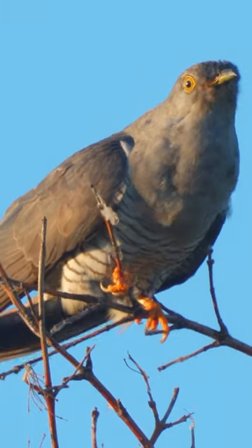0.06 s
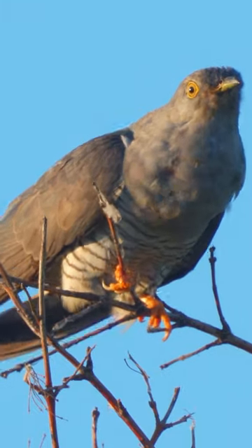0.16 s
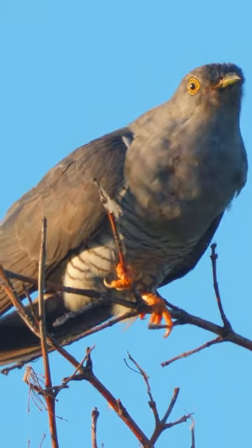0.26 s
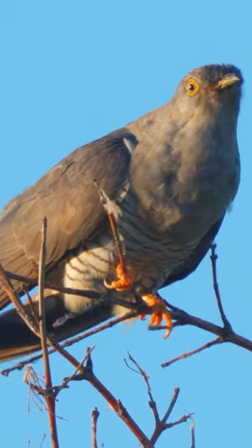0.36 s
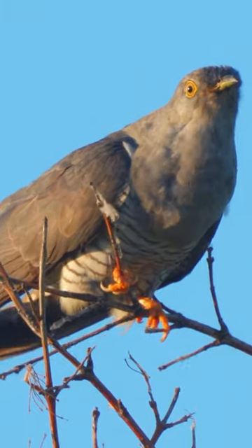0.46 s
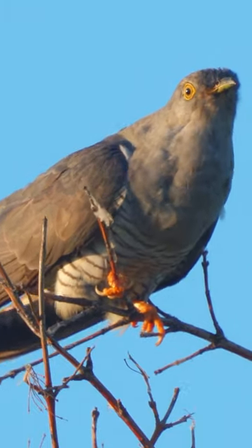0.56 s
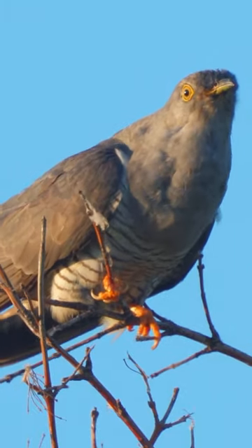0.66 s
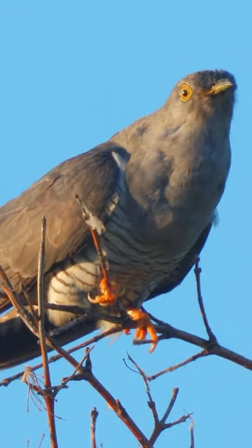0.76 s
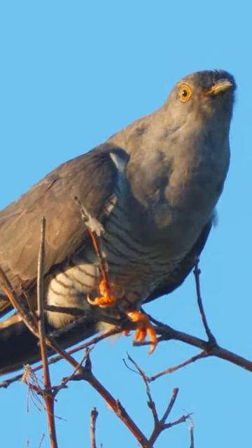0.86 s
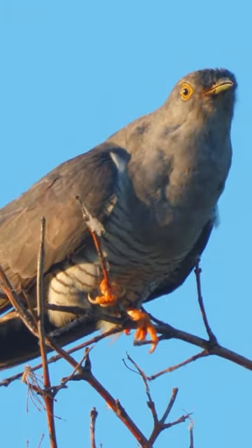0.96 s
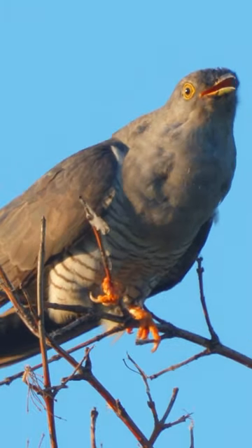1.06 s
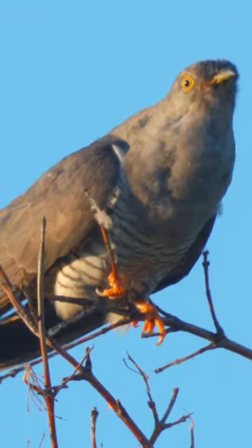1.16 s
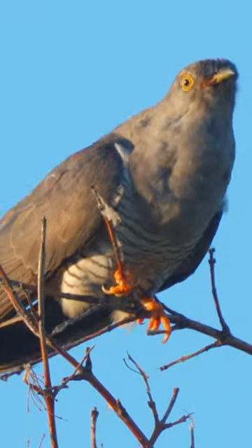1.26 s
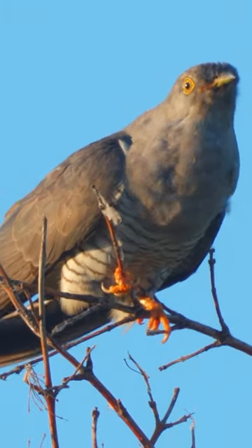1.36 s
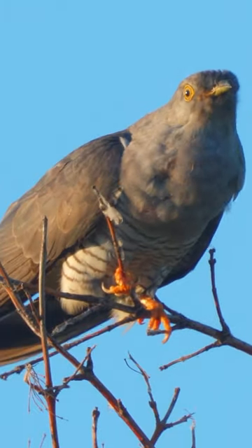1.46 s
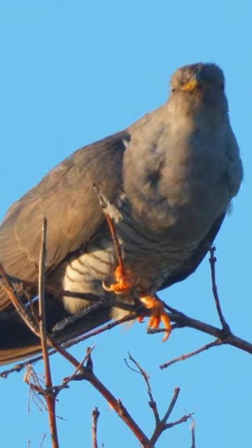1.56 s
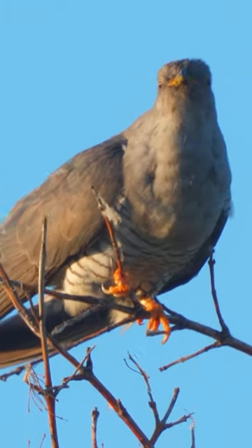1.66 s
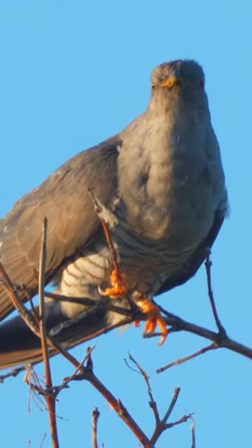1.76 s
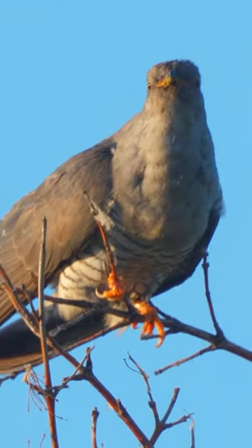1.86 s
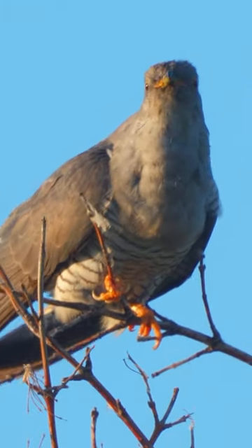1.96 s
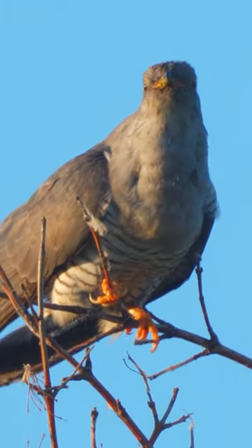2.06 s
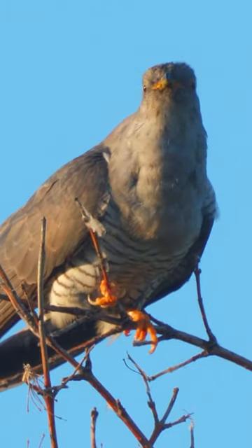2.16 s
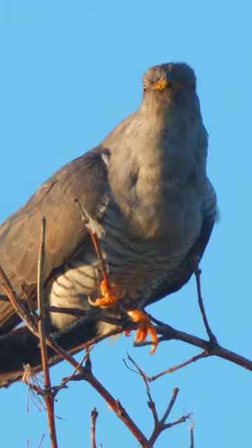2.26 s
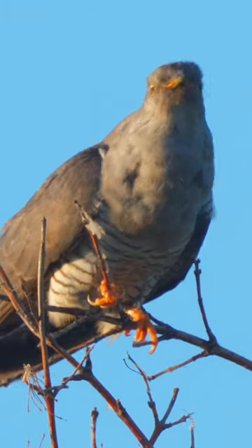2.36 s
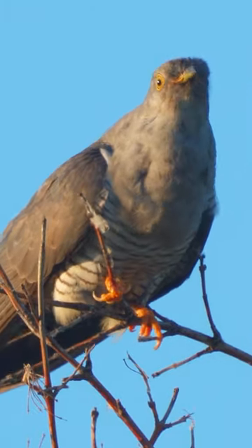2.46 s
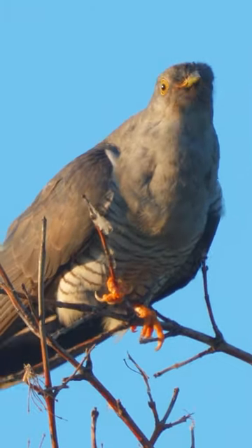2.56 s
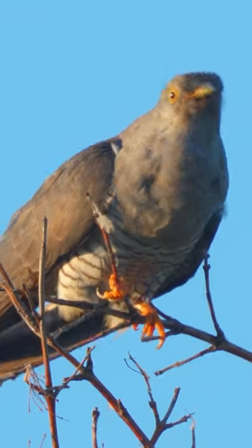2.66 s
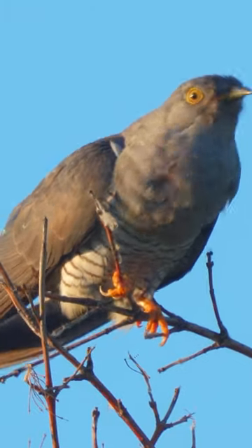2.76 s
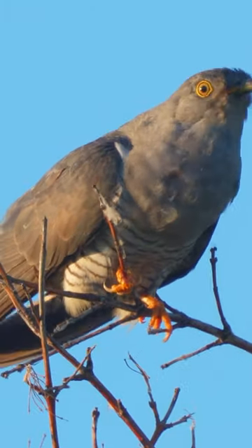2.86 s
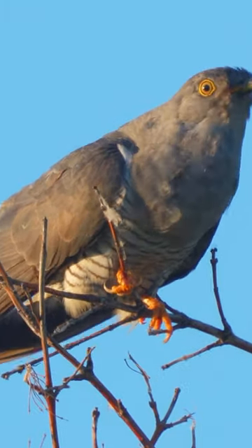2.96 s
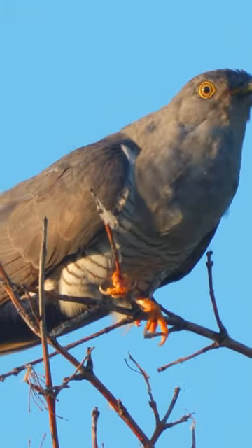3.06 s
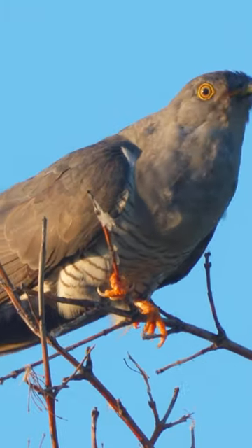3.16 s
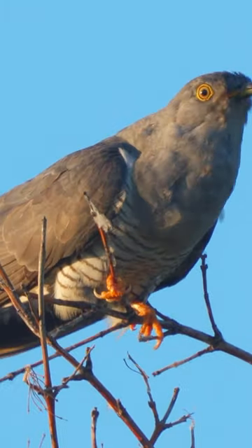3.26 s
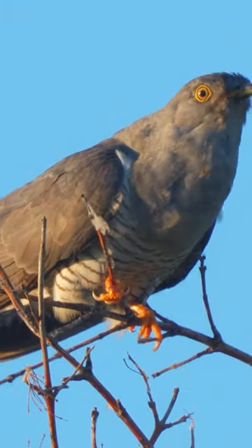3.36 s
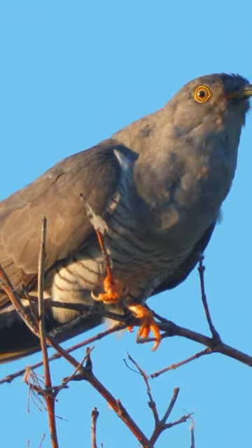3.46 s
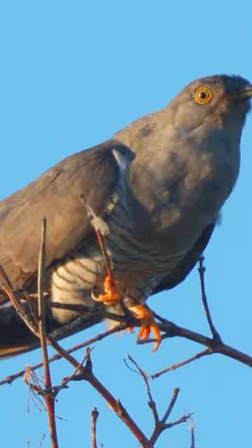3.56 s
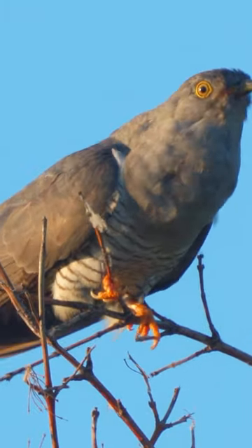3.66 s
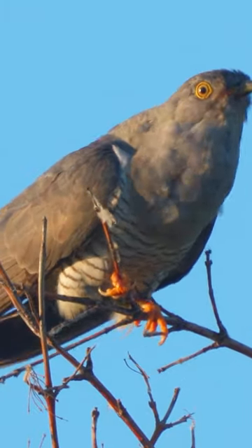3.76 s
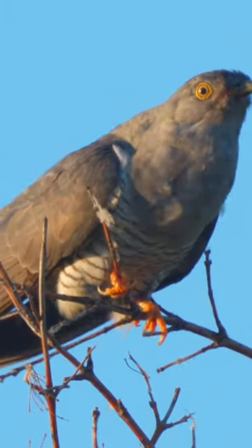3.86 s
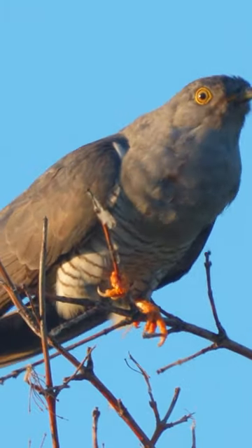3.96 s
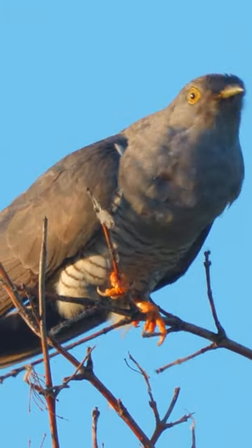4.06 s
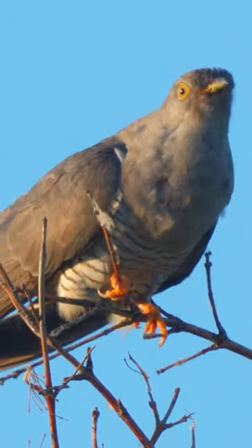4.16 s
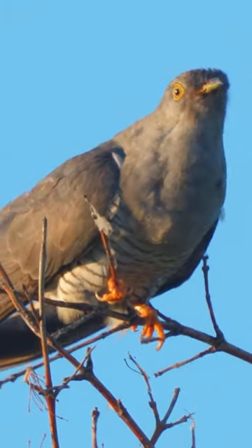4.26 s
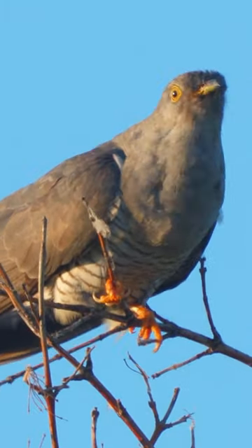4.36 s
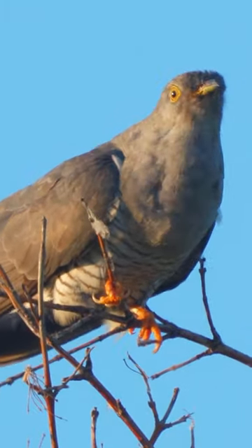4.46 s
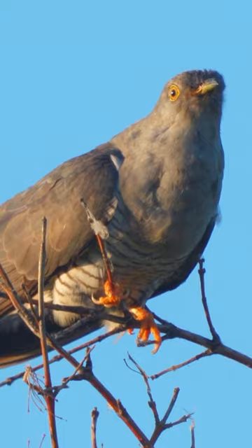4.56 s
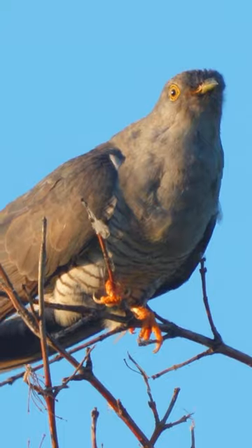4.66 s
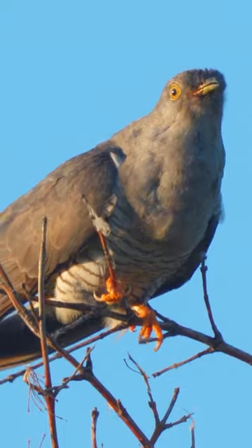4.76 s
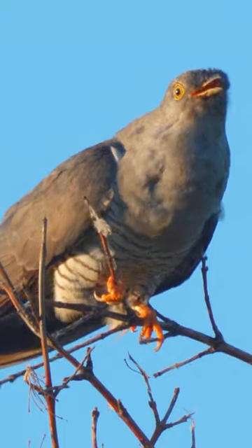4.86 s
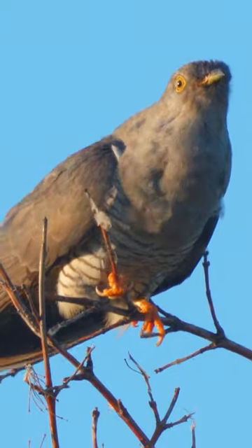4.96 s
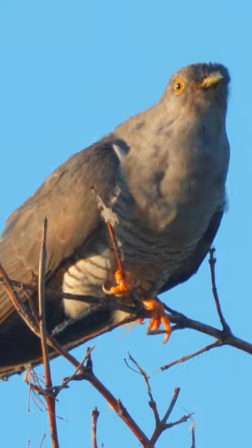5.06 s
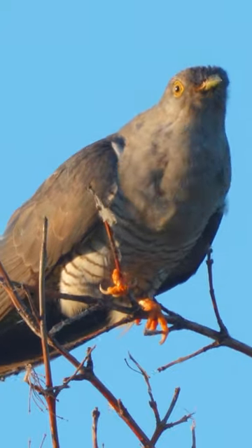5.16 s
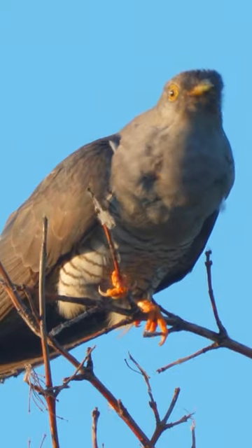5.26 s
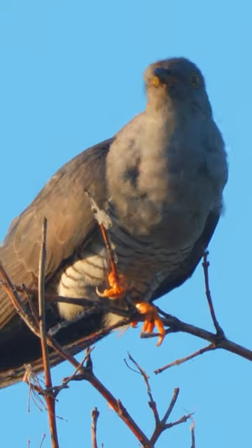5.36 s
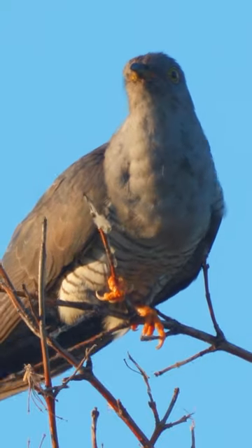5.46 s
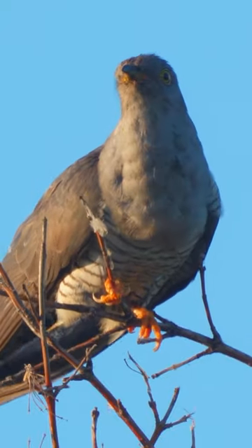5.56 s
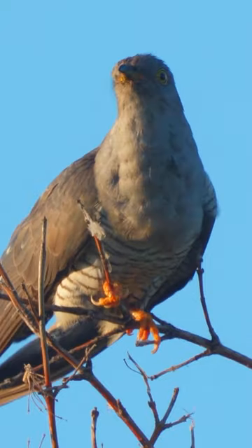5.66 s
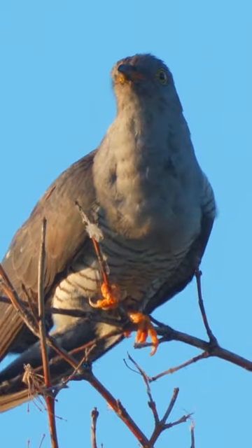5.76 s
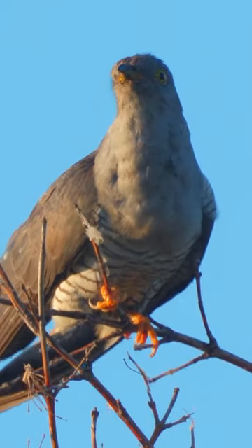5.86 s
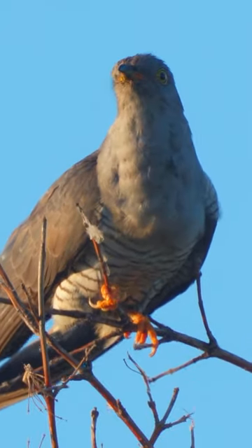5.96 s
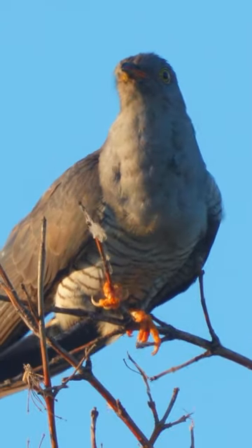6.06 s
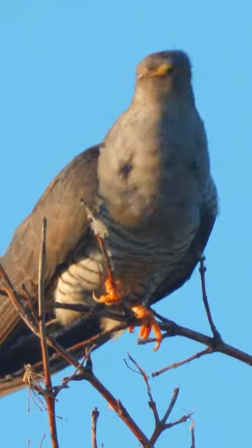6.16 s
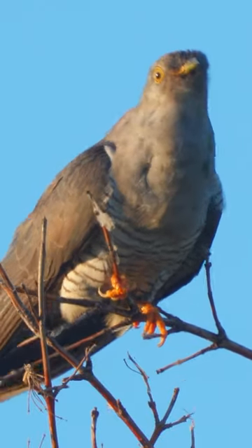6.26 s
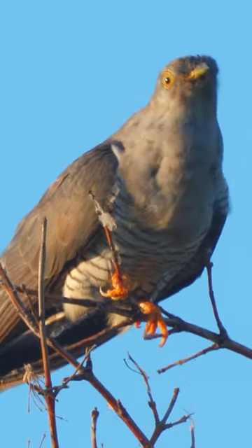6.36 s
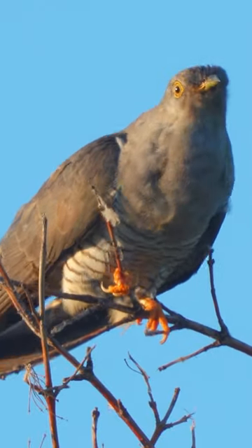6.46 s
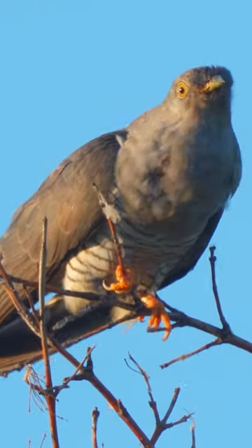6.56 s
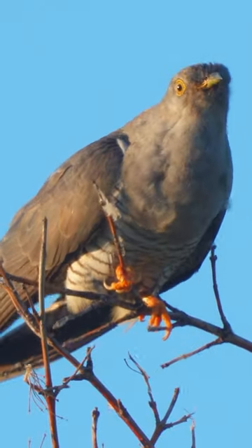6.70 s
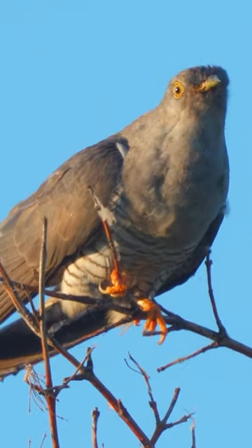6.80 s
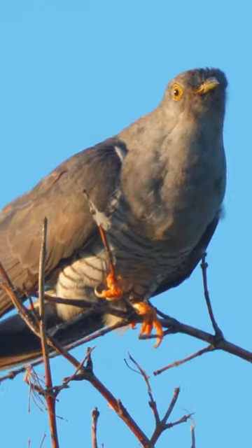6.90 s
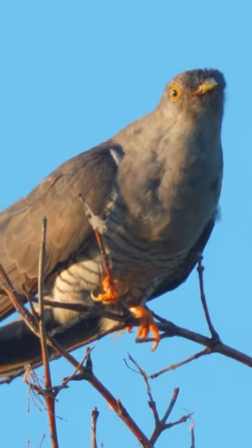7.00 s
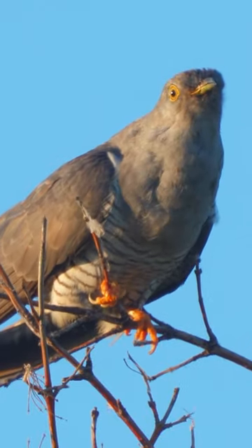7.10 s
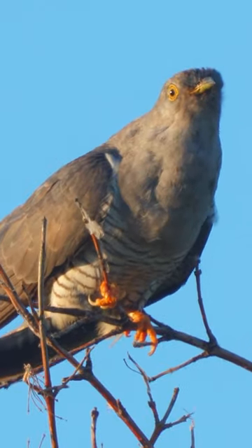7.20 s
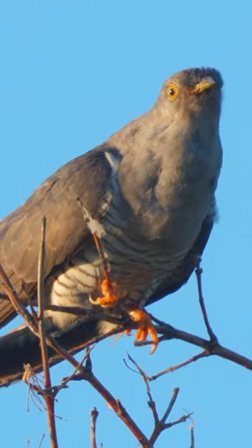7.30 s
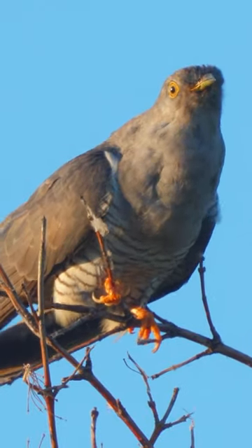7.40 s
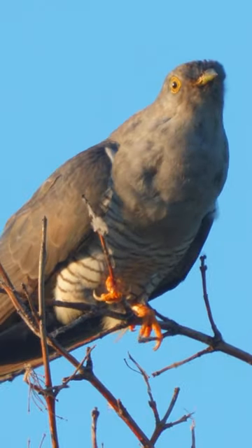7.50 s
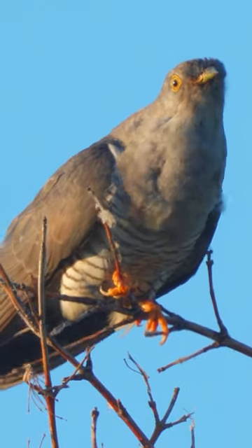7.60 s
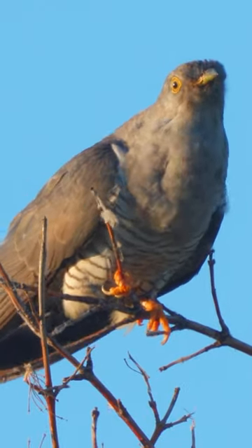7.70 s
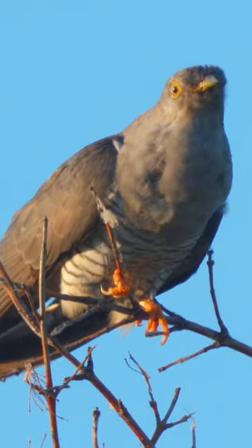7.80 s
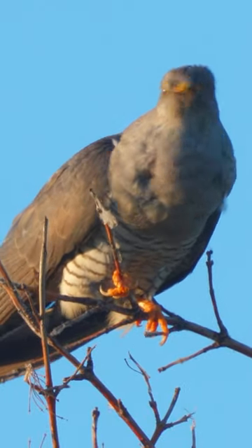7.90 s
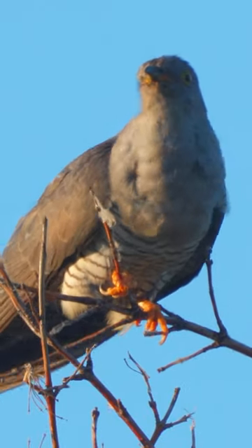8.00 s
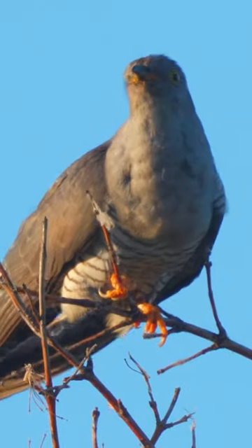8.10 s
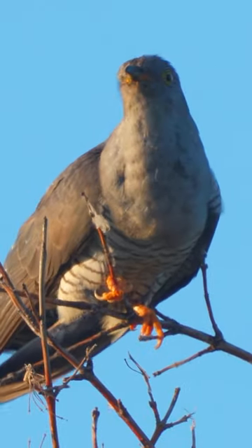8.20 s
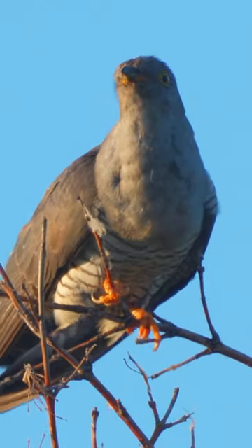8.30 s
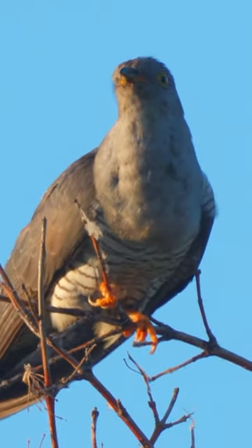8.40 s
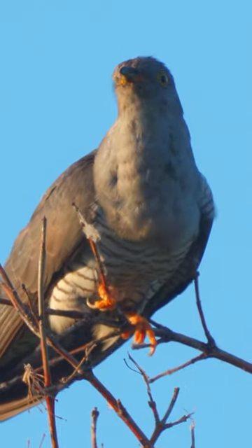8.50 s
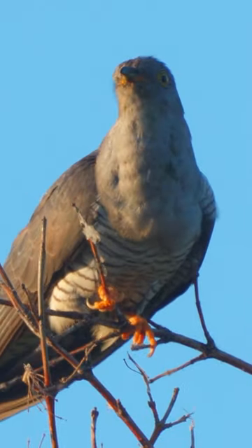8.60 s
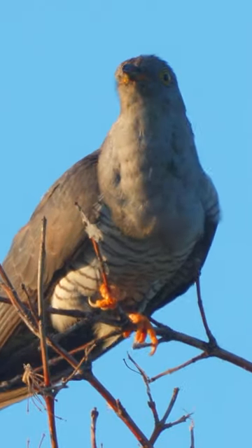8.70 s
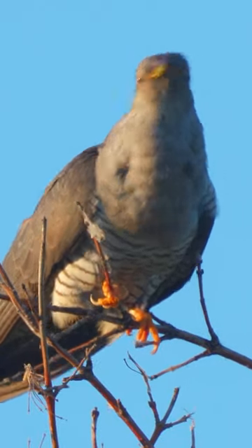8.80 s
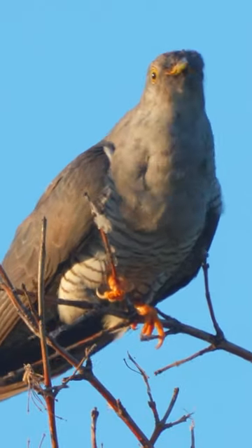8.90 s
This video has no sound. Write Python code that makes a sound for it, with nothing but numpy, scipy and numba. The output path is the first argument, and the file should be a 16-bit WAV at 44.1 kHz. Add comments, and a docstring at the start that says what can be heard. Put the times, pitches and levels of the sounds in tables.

```python
"""A cuckoo close to the microphone sings two hollow, almost pure notes, sines that scoop up, sag and drop;
the trees around return a ragged echo, made by convolution with decaying noise.
Further off, frequency-modulated sines make chattering warblers, a mole cricket pulses a sagging tone,
overlapping toad hoots merge into drones, and an engine's impulses ring its exhaust resonances.
Coloured noise hisses over a faint whine; a limiter flattens every cuckoo note and ducks the background."""
import sys
import numpy as np
from scipy import signal
from scipy.fft import rfft, irfft
from scipy.io import wavfile
from scipy.ndimage import uniform_filter1d, minimum_filter1d, map_coordinates
from numba import njit

SR = 44100
rng = np.random.default_rng(int(sys.argv[2]) if len(sys.argv) > 2 else 0)


def store_pcm(level_fs):
    """Save levels as 16-bit WAV."""
    pcm = np.round(np.clip(level_fs, -1, 1) * 32767).astype(np.int16)
    wavfile.write(sys.argv[1], SR, np.atleast_2d(pcm).T)


N = 394254
T = np.arange(N) / SR
LEAD_IN = SR // 4  # samples before time zero, whose echoes still ring
COURSE = np.array([0, .5, 1])  # start, middle and end of a small bird's note


def undb(db):
    """Logarithmic level: 20 dB is a tenfold amplitude."""
    return 10 ** (np.asarray(db) / 20)


def level(x, db):
    """Root mean square: scale a signal to an rms level in dB."""
    return x * undb(db) / np.sqrt(np.mean(x ** 2) + 1e-18)


def add(track, s, x):
    """Superposition: mix x into the track from time s."""
    i = int(np.clip(s * SR, 0, len(track)))
    track[i:i + len(x)] += x[:len(track) - i]


def walk(rate, size=N):
    """Band-limited randomness: smooth wandering through `rate` random points per second, spread near 1."""
    steps = rng.standard_normal(int(size / SR * rate) + 4)
    place = np.arange(size) / SR * rate + 1
    return map_coordinates(steps, [place], order=3, mode="nearest")


def turn(hz):
    """Phase is the time integral of frequency."""
    return 2 * np.pi * np.cumsum(hz) / SR


def resonate(x, hz, width):
    """Two-pole resonance, gain 1 at the centre."""
    return signal.lfilter(*signal.iirpeak(hz, hz / width, fs=SR), x)


def swell(u, edge):
    """Amplitude envelope over u = 0..1 with rounded ends."""
    return np.sin(np.pi / 2 * np.clip(np.minimum(u, 1 - u) / edge, 0, 1)) ** 2


def trees(x, wet_db, t60, build_s):
    """Multiple scattering: trunks and leaves add a diffuse tail that builds up, then dies away."""
    t = T[:SR * 3 // 2]
    build_up = 1 - np.exp(-(t / build_s) ** 2)
    decay = np.exp(-np.log(1000) * t / t60)  # 60 dB in t60 seconds
    scatter = rng.standard_normal(len(t)) * build_up * decay
    scatter /= np.linalg.norm(scatter)
    return x + undb(wet_db) * signal.fftconvolve(x, scatter)[:len(x)]


def cuckoo():
    """Two-note call of near-sinusoids: a short arch, then a longer, lower held note; starts LEAD_IN early."""
    # calls: onset t/s, pitch the first note aims for f/Hz
    calls = [(-.126, 674), (1.156, 676), (2.437, 680), (3.703, 680), (4.971, 684), (6.226, 691),
             (7.557, 676), (8.876, 686)]
    # faint overtones of either note: multiple of the fundamental, level/dB relative to it at full effort
    cu_overtones = [(3, -49), (4, -58.5), (6, -51), (7, -40)]
    koo_overtones = [(3, -45)]
    # scoop and drop are shares of the pitch; the first note is all arch, the second held
    cu_pitch = dict(scoop=.16, scoop_s=.022, sag_per_s=0, drop=.14, drop_s=.012)
    koo_pitch = dict(scoop=.04, scoop_s=.007, sag_per_s=.175, drop=.033, drop_s=.008)
    # levels ahead of the limiter
    cu_level = dict(db=5.5, attack_s=.005, release_s=.002)
    koo_level = dict(db=8, attack_s=.0044, release_s=.002)
    cu_length_s, koo_length_s = .081, .153
    koo_delay_s, koo_hz = .332, 522  # the second note always aims for the same pitch

    out = np.zeros(N + 2 * LEAD_IN)
    for s, cu_hz in calls:
        start = s + LEAD_IN / SR
        add(out, start, note(cu_length_s, cu_hz, cu_overtones, cu_pitch, cu_level))
        add(out, start + koo_delay_s, note(koo_length_s, koo_hz, koo_overtones, koo_pitch, koo_level))
    return out[LEAD_IN:]


def note(length, hz, overtones, pitch, loudness):
    """Acoustic filtering: the swollen throat passes little but the fundamental; onset LEAD_IN samples in."""
    t = (np.arange(LEAD_IN + int((length + .03) * SR)) - LEAD_IN) / SR
    held = np.clip(t, -.01, length + .01)  # keeps the exponentials bounded
    scoop = pitch["scoop"] * np.exp(-held / pitch["scoop_s"])
    sag = pitch["sag_per_s"] * held
    drop = pitch["drop"] * np.exp((held - length) / pitch["drop_s"])
    bend = 1 - scoop - sag - drop
    phase = turn(hz * bend * (1 + .0021 * walk(120, len(t))))
    # overtones come through, unsteadily, only at full effort
    effort = swell(t / length, .3) * undb(2.5 * walk(40, len(t)))
    harmonics = sum(undb(part_db) * np.sin(round(k) * phase) for k, part_db in overtones)
    tone = np.sin(phase) + effort * harmonics
    attack = gate(t / loudness["attack_s"])
    release = gate((length - t) / loudness["release_s"])
    return tone * undb(loudness["db"]) * attack * release


def gate(x):
    """Sigmoid switching: a smooth rise from silence to full amplitude."""
    return .5 + .5 * np.tanh(x / 2 - .8)


def wavering_echo(song):
    """Diffuse reflection: the trees' answer to the cuckoo wavers in delay and level."""
    sway_s, flicker_db = .0003, 1.5
    echo = trees(song, wet_db=-23, t60=.49, build_s=.036) - song
    place = np.arange(len(echo)) + sway_s * SR * walk(45, len(echo))
    swayed = map_coordinates(echo, [place], order=3, mode="nearest")
    return swayed * undb(flicker_db * walk(70, len(echo)))


def warblers():
    """Superposed songs from the surrounding bushes, blurred by short scattering."""
    out = sweeps() + whistles() + buzzes() + churrs() + pips()
    return trees(out, wet_db=-5.5, t60=.094, build_s=.0039)


def slur(length, pitches, flutter_hz, depth_hz, edge):
    """Frequency modulation of a curved glide: the deeper its flutter, the more it rasps and throbs."""
    u = np.linspace(0, 1, max(int(length * SR), 64))
    glide = np.polyval(np.polyfit([0, .5, 1], pitches, 2), u)
    flutter = np.sin(turn(flutter_hz + 6 * walk(55, len(u))))
    roughness = .82 * flutter + .13 * walk(400, len(u))
    hz = glide + depth_hz * roughness + 14 * walk(200, len(u))
    rasp = depth_hz / 250
    throb_db = 4.5 * rasp * np.sin(turn(58 * (1 + .12 * walk(30, len(u)))))
    grain_db = (1 + rasp) * walk(110, len(u))
    loudness = level(undb(throb_db + grain_db), 0)
    return loudness * np.sin(turn(hz)) * swell(u, edge)


def buzz(length, pitches, flutter_hz):
    """Frequency modulation by a flutter whose swing widens with its rate; loudest in mid-note."""
    # swing as a share of the pitch, and its growth per Hz of flutter
    swing_share, swing_per_hz = .02, .00037
    depth_hz = pitches[1] * (swing_share + swing_per_hz * flutter_hz)
    tone = slur(length, pitches, flutter_hz, depth_hz, edge=.22)
    return tone * undb(4 * np.sin(np.linspace(0, np.pi, len(tone))) - 7)


def sweeps():
    """Linear chirps made scratchy by flutter, all sweeping at one speed."""
    # onset t/s, start f/Hz, end f/Hz, level/dB ahead of a common 6 dB cut
    sweep_table = [(.94, 4550, 3380, -33.5), (1.264, 4800, 3900, -30), (1.669, 4770, 3750, -23),
                   (1.974, 3940, 4500, -32), (2.02, 3970, 4500, -31.5), (4.315, 3850, 3050, -32),
                   (4.664, 5000, 4300, -31), (4.784, 3780, 2670, -28.5), (4.921, 3600, 2670, -32),
                   (5.068, 4320, 2950, -30.5), (5.532, 4500, 3950, -26), (5.927, 4050, 4800, -31),
                   (6.454, 4570, 3600, -26.5), (6.495, 3900, 2480, -27.5), (7.164, 4590, 3650, -29),
                   (7.195, 4760, 3580, -24), (7.688, 3100, 2600, -28), (7.726, 3020, 2600, -27),
                   (7.762, 3090, 2550, -29), (8.105, 3150, 3450, -25.5), (8.153, 3860, 2730, -27),
                   (8.327, 4550, 3020, -30), (8.485, 4530, 3000, -29.5)]
    speed_hz_per_s, scratch_hz = 24000, 79.7
    out = np.zeros(N)
    for s, start_hz, end_hz, db in sweep_table:
        length = abs(end_hz - start_hz) / speed_hz_per_s
        glide = start_hz + (end_hz - start_hz) * COURSE
        add(out, s, undb(db - 6) * slur(length, glide, 190, scratch_hz, edge=.22))
    return out


def whistles():
    """Near-pure tones whose frequency follows a parabolic arch."""
    # onset t/s, length t/s, top f/Hz, time to the top t/s, fall at the end farther from the top f/Hz,
    # level/dB ahead of a common 3 dB cut
    whistle_table = [(1.395, 0.052, 3560, .02, 40, -30), (1.797, 0.17, 4330, 0, 420, -59),
                     (2.188, .14, 3835, .04, 180, -39), (2.755, .2, 2777, .09, 401, -35),
                     (2.797, 0.2, 4250, .1, 278, -43.5), (2.93, 0.08, 3810, .005, 150, -33.5),
                     (3.56, 0.27, 3614, .115, 640, -27), (4.284, .04, 4060, .018, 180, -31.5),
                     (4.734, 0.078, 4130, .06, 200, -36), (4.875, 0.056, 4080, .055, 200, -32.5),
                     (5.351, .2, 4530, .15, 348, -30.5), (5.89, 0.23, 3970, 0.035, 99, -37),
                     (6.327, 0.053, 4220, 0.016, 222, -36.5), (6.49, 0.093, 4160, .02, 420, -34.5),
                     (7.445, 0.034, 3640, .035, 80, -31.5), (7.556, 0.066, 3970, .005, 260, -30)]
    out = np.zeros(N)
    for s, length, hz, top_s, fall_hz, db in whistle_table:
        from_top = (length * COURSE - top_s) / max(top_s, length - top_s)
        arch = hz - fall_hz * from_top ** 2
        add(out, s, undb(db - 3) * slur(length, arch, 170, 15, edge=.2))
    return out


def buzzes():
    """Frequency-modulated notes; in the low ones the other side of the syrinx joins in, higher and weaker."""
    # onset t/s, length t/s, middle f/Hz, glide f/Hz, flutter rate f/Hz, level/dB ahead of the buzz envelope
    buzz_table = [(0, 0.17, 4160, -270, 73.3, -30), (0.216, 0.16, 3250, -2, 131, -33),
                  (0.421, 0.12, 3970, -300, 59, -34), (0.531, .14, 2580, -2, 191, -32),
                  (0.734, 0.18, 4060, 228, 133, -35), (.84, .1, 2680, -300, 98.5, -33.5),
                  (1.351, 0.23, 2570, -63, 200, -26.5), (1.724, .16, 2573, 9, 130, -32.5),
                  (1.75, .18, 3300, -45, 130, -42), (.557, .25, 3680, -58, 127.7, -41),
                  (2.076, 0.087, 4060, -100, 66, -33.5), (3.868, 0.27, 2620, -90, 159, -30.5),
                  (6.076, .11, 2590, 130, 130, -41), (6.672, 0.25, 3275, 305, 309, -24.5),
                  (5.29, .19, 2880, -300, 105, -31.5), (7.274, 0.13, 4700, 78, 34, -33.5),
                  (7.845, .15, 4340, 353, 59, -31.5), (8.162, 0.09, 4010, -3, 131, -36),
                  (8.6, .061, 3390, -170, 46.3, -29)]
    second_voice_hz, second_voice_db = 484, -13  # relative to the first voice
    out = np.zeros(N)
    for s, length, hz, glide_hz, flutter_hz, db in buzz_table:
        glide = hz + glide_hz * (COURSE - .5)
        add(out, s, undb(db) * buzz(length, glide, flutter_hz))
        if hz < 3000:
            second_voice = buzz(length, glide + second_voice_hz, flutter_hz)
            add(out, s, undb(db + second_voice_db) * second_voice)
    return out


def churrs():
    """Exponential relaxation of pitch: one bird's recurring buzz sinks and levels out."""
    # onset t/s, length t/s, start f/Hz, level/dB ahead of the buzz envelope
    churr_table = [(4.431, .2, 3450, -35), (5.16, 0.16, 3656, -29), (5.609, 0.11, 3610, -35.5),
                   (5.944, 0.064, 3840, -36), (6.311, .11, 3620, -31.5), (8.288, 0.16, 3250, -38),
                   (8.686, 0.17, 3310, -33.5)]
    fall_hz, fall_s, flutter_hz = 1204, .12, 146.8
    out = np.zeros(N)
    for s, length, hz, db in churr_table:
        sinking = hz - fall_hz * (1 - np.exp(-length * COURSE / fall_s))
        add(out, s, undb(db) * buzz(length, sinking, flutter_hz))
    return out


def pips():
    """Amplitude modulation: a fast tremor gives each quick pip a weaker sideband on either side."""
    # runs: onset t/s, length t/s, f/Hz, level/dB ahead of the build-up along the run
    runs = [(0.031, 0.19, 3240, -34.5), (0.77, 0.19, 3190, -39.5), (1.815, 0.15, 3135, -35),
            (2.519, 0.19, 3184, -35), (3.265, 0.16, 3110, -33.5), (4.346, 0.16, 3130, -37.5),
            (4.868, 0.09, 2690, -36)]
    out = np.zeros(N)
    for s, length, hz, db in runs:
        for lag in np.arange(0, length - .01, .034):
            pip = slur(.011, [hz + 40, hz + 30, hz - 90], 0, 0, edge=.23)
            pip = pip + undb(-6.5) * pip * np.cos(2 * np.pi * 520 * T[:len(pip)])
            # each run gathers strength after its first pip
            gain_db = db + 3 - 4.3 * np.exp(-lag / .024)
            add(out, s + lag, undb(gain_db) * pip)
    return out


def far_chorus(rate=30, chorus_db=-49):
    """Diffuse superposition: many more small birds, blurred by distance, twitter faintly."""
    out = np.zeros(N)
    for when, span, height, bend, sweep, rasp, distance in rng.random((int(rate * N / SR), 7)):
        hz = 2550 + 1800 * height
        slope = 900 * (sweep - .6) * np.array([-1, 0, 1])
        arch = np.array([0, 400 * (bend - .3), 0])
        length = .012 + .064 * span ** 3
        chirp = slur(length, hz + slope + arch, 60 + 120 * bend, 260 * rasp, edge=.17)
        # short chips are the stronger ones
        add(out, when * N / SR, chirp * undb(-7 * distance - 6.1 * span))
    out = trees(out, wet_db=-4, t60=.3, build_s=.01)
    return level(out, chorus_db)


def cricket(hz=1492, stroke_hz=39):
    """Stridulation: each wing stroke of the mole cricket rings one short tone that sags in pitch."""
    # trill, which pauses once: t/s, rms level/dB
    trill = [(0, -43.5), (1.35, -44.5), (1.45, -68), (2.53, -67.5), (2.6, -45.5), (2.95, -39.5), (5.2, -40),
             (5.6, -43.5), (7, -41.5), (8.9, -43)]
    stroke = turn(stroke_hz * (1 + .02 * walk(4.4))) / (2 * np.pi) % 1
    tone = np.sin(turn(hz + 50 * (.5 - stroke) + 16 * walk(130)))
    pulses = tone * swell(stroke, .5) * undb(1.6 * walk(30))
    song = trees(pulses, wet_db=-13, t60=.79, build_s=.03)
    return level(song, 0) * undb(np.interp(T, *np.transpose(trill)))


def toads():
    """Interference: many soft hoots on nearly the same pitch merge into a wavering drone."""
    # choruses: centre f/Hz, rms level/dB, hoots per second [1/s]
    choruses = [(482.8, -33, 46), (350.3, -44.5, 25)]
    out = np.zeros(N)
    for hz, db, rate in choruses:
        chorus = np.zeros(N)
        for when, tuning, length, distance in rng.random((int(rate * N / SR), 4)):
            u = np.linspace(0, 1, int((.058 + .082 * length) * SR))
            bend = 1 + .09 * (tuning - .5) + .075 * (.5 - u)
            hoot = np.sin(turn(hz * bend)) * swell(u, .28)
            add(chorus, when * N / SR, hoot * undb(-9 * distance))
        out += level(chorus, db)
    return out


def engine():
    """Impulse-driven resonance: uneven firings boom in an exhaust; only bass carries, smeared on the way."""
    # running: t/s, mean firing rate f/Hz, rms level/dB
    running = [(0, 27.4, -23.5), (1.7, 27, -24), (3.4, 26.2, -24.5), (4.7, 25.8, -23.3), (5.3, 24.3, -26.5),
               (7.6, 24, -27), (8.4, 23.8, -25.5)]
    # exhaust resonances, each passed twice: centre f/Hz, width of one pass f/Hz, level/dB
    exhaust = [(66, 24, 0), (88, 34, -4), (142, 44, -20)]
    s, rate, db = np.transpose(running)
    cycles = turn(np.interp(T, s, rate) * (1 + .075 * walk(22))) / (2 * np.pi)
    firings = np.diff(np.floor(cycles), prepend=0) * undb(2.6 * walk(30))
    boom = np.zeros(N)
    for hz, width, mode_db in exhaust:
        boom += undb(mode_db) * resonate(resonate(firings, hz, width), hz, width)
    boom = trees(boom, wet_db=-5, t60=.5, build_s=.03)
    boom = signal.sosfilt(signal.butter(4, 36, "high", fs=SR, output="sos"), boom)
    return level(boom, 0) * undb(np.interp(T, s, db))


def bumps():
    """Damped oscillation: dull, quickly decaying knocks near the microphone."""
    # onset t/s, f/Hz, decay to 1/e t/s, initial level/dB
    knocks = [(5.882, 176, 0.0047, -9), (5.889, 310, 0.0082, -14), (5.908, 197, 0.0046, -13),
              (8.162, 79.93, 0.035, -8.5)]
    out, t = np.zeros(N), T[:SR // 4]
    for s, hz, decay, db in knocks:
        add(out, s, undb(db) * np.sin(2 * np.pi * hz * t) * np.exp(-t / decay))
    return out


def air():
    """Spectrally shaped noise: a gently swelling outdoor murmur under steady hiss and a thin whine."""
    # open air and microphone hiss, relative spectrum: f/Hz, level/dB
    spectrum = [(24, -44.5), (45, -5.5), (90, 1.5), (170, -12.5), (270, -17), (500, -13.5), (1000, -20),
                (1400, -23.5), (1750, -30), (3000, -36), (5000, -31), (8300, -41), (9300, -32),
                (12500, -38), (14000, -32), (15600, -37.5)]
    # electronic whine: f/Hz, rms level/dB
    whine_lines = [(6750, -60.5), (7125, -56.5), (7500, -63), (13500, -63.5), (13875, -56), (14250, -58.5),
                   (14625, -62), (15375, -64.5)]
    noise_db = -29.5  # rms, before the murmur swells
    hz, db = np.transpose(spectrum)
    bins = np.fft.rfftfreq(N, 1 / SR)
    colour = undb(np.interp(np.log(bins + 1), np.log(hz), db))
    noise = level(irfft(rfft(rng.standard_normal(N)) * colour, N), noise_db)
    murmur = signal.sosfilt(signal.butter(1, 900, fs=SR, output="sos"), noise)
    whine = np.zeros(N)
    for line_hz, line_db in whine_lines:
        whine += undb(line_db) * np.sqrt(2) * np.sin(2 * np.pi * line_hz * T)
    return noise + .13 * walk(2.6) * murmur + whine


def scene():
    """Linear superposition: the near cuckoo and its echo over the distant life of the meadow."""
    song = cuckoo()
    near = (song + wavering_echo(song))[LEAD_IN:]
    animals = warblers() + far_chorus() + cricket() + toads()
    return (near + animals + engine() + bumps() + air())[None]


@njit
def hold(peaks, fall):
    """Peak detection: follow rises at once and let go exponentially."""
    out, e = np.empty(len(peaks)), 0.
    for i in range(len(peaks)):
        e = max(peaks[i], e * fall)
        out[i] = e
    return out


def record(dry):
    """Gain reduction: a look-ahead limiter holds peaks near its ceiling, then a low-pass cuts the top."""
    ceiling, release_s, top_hz = .9, .028, 15700
    # windows centred on each sample look ahead as well as back
    peaks = -minimum_filter1d(-np.abs(dry[0]), size=180)
    envelope = uniform_filter1d(hold(peaks, np.exp(-1 / (release_s * SR))), size=160)
    limited = dry * ceiling / np.maximum(envelope, ceiling)
    return signal.sosfilt(signal.ellip(10, .02, 80, top_hz, fs=SR, output="sos"), limited)


dry = scene()
out = record(dry)
store_pcm(out)
```